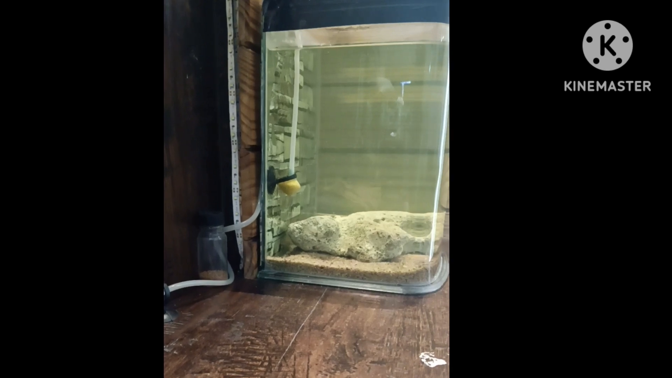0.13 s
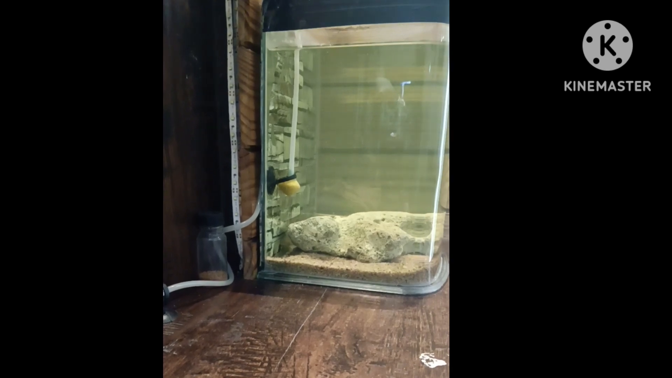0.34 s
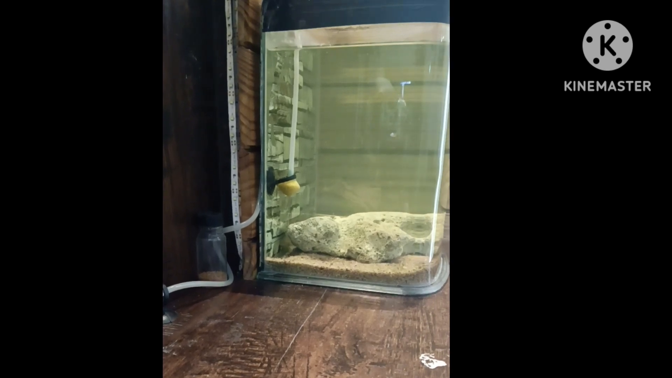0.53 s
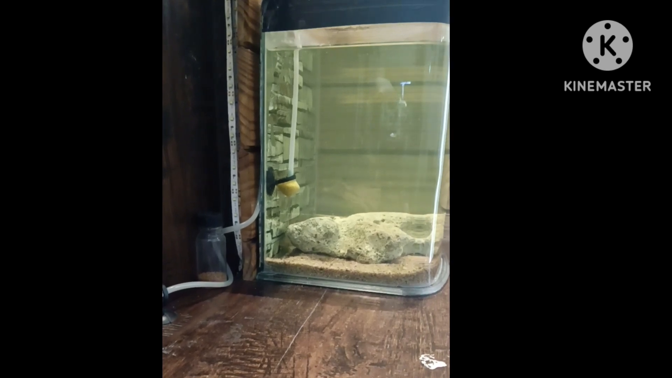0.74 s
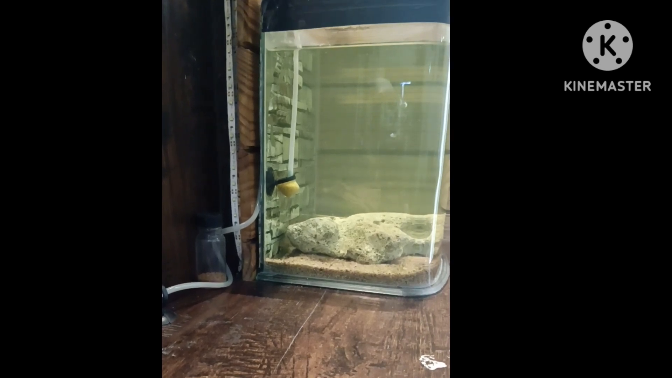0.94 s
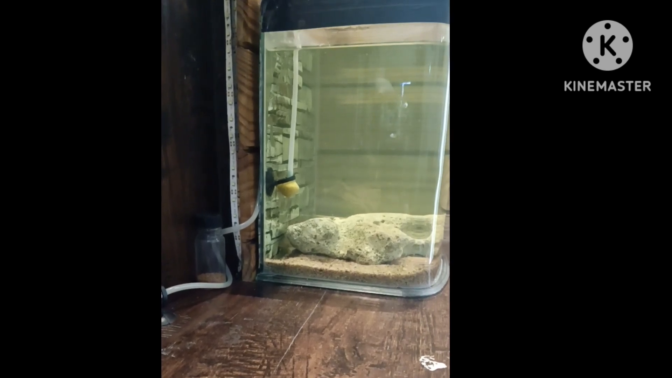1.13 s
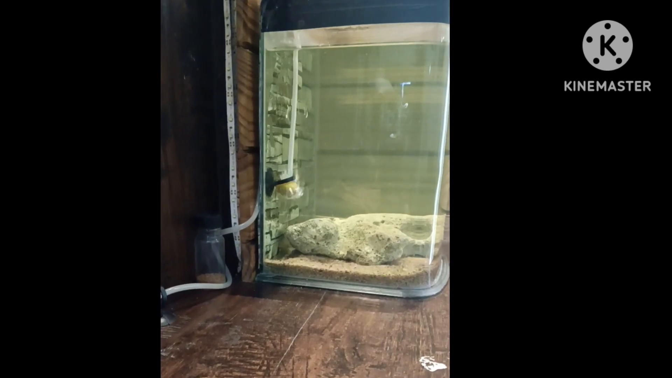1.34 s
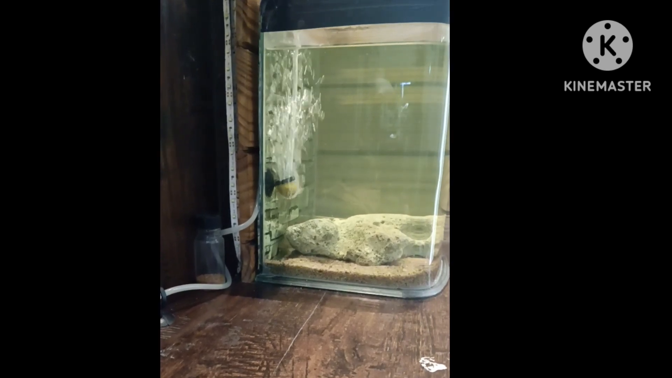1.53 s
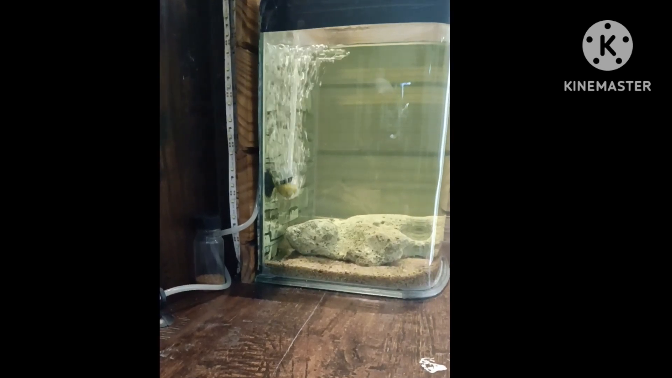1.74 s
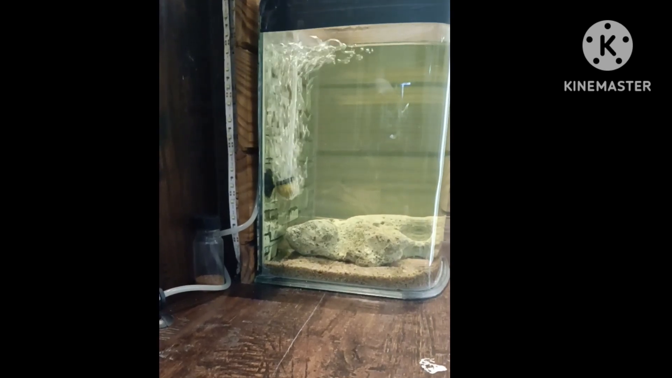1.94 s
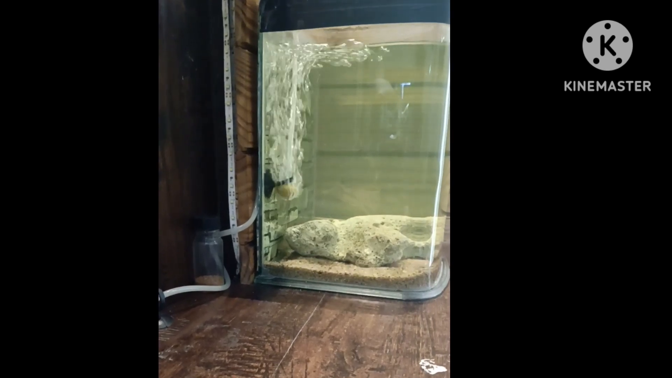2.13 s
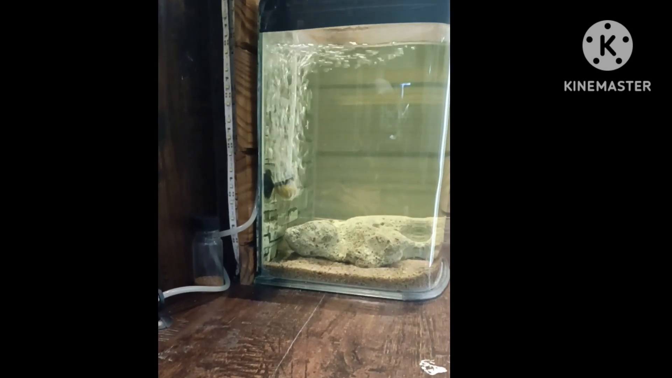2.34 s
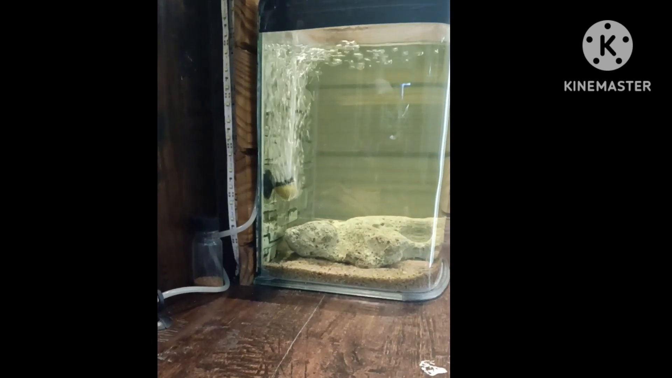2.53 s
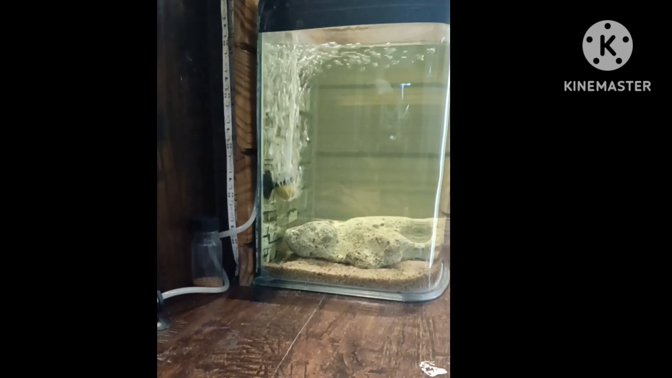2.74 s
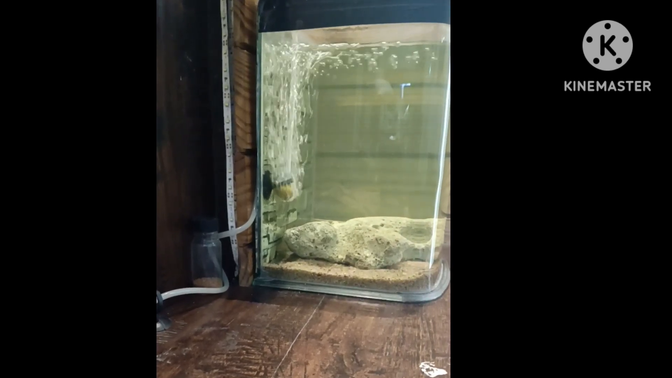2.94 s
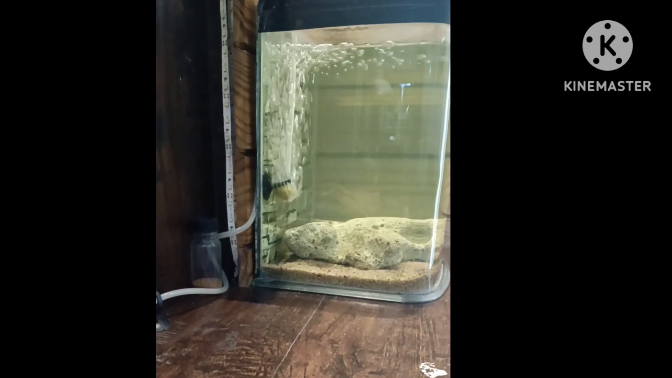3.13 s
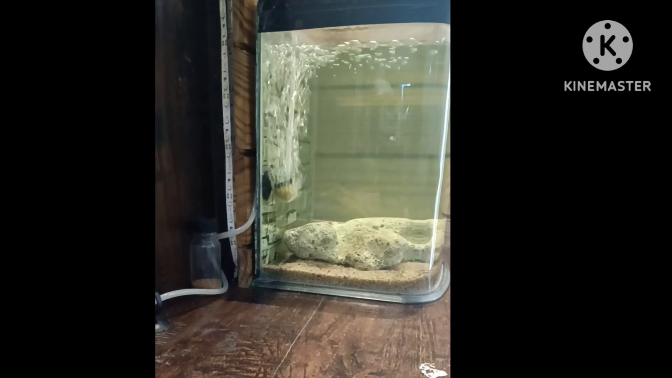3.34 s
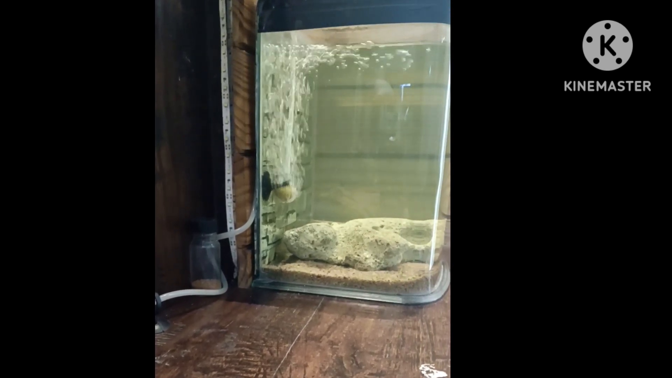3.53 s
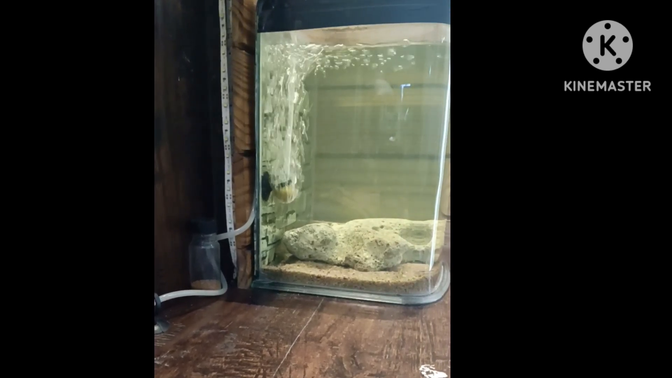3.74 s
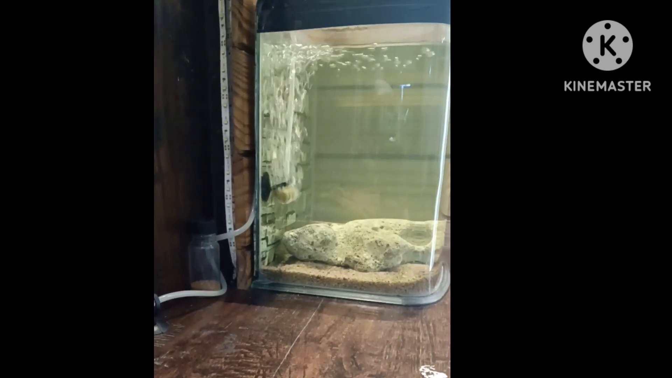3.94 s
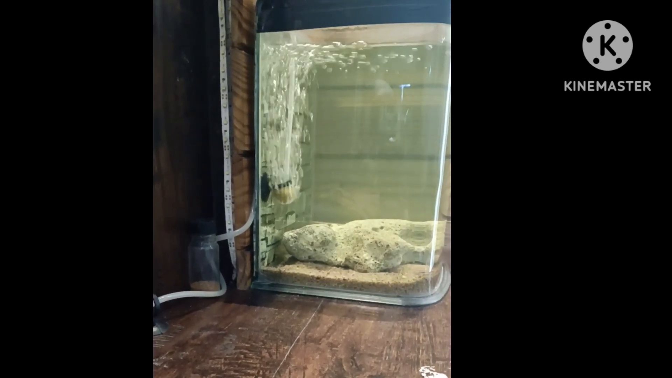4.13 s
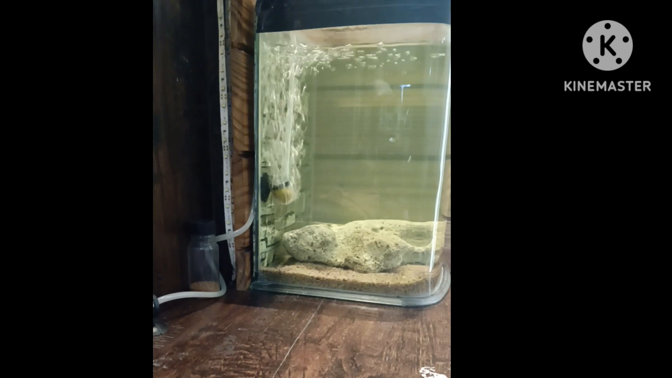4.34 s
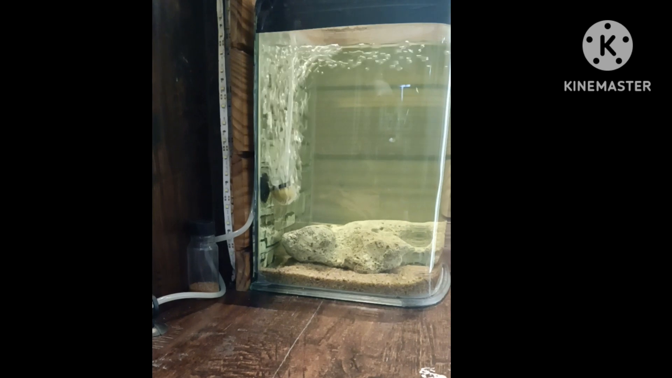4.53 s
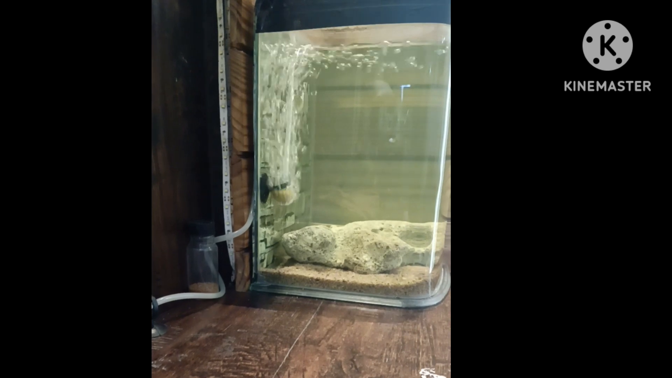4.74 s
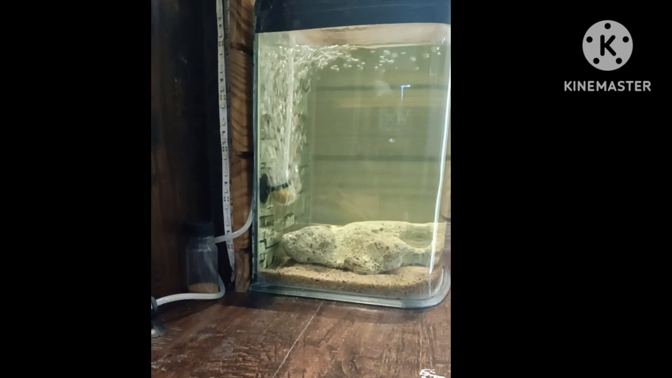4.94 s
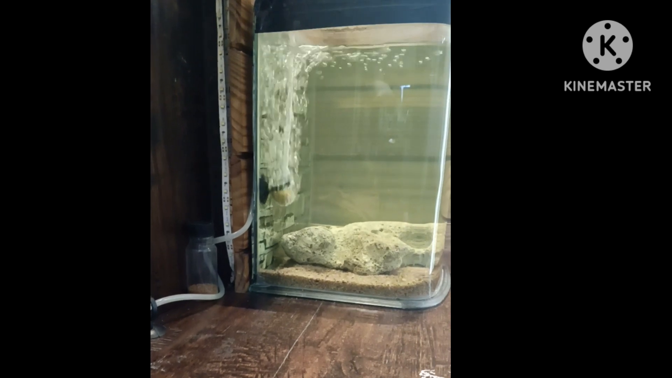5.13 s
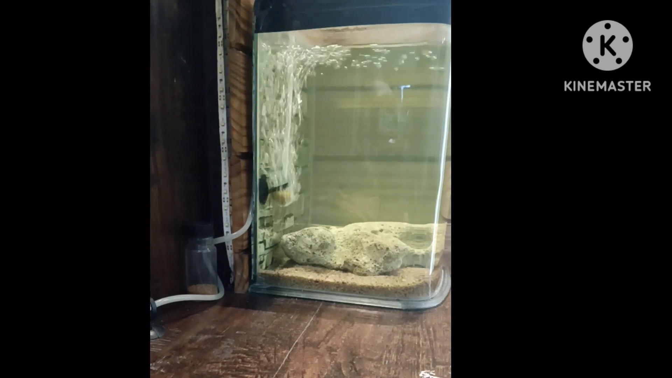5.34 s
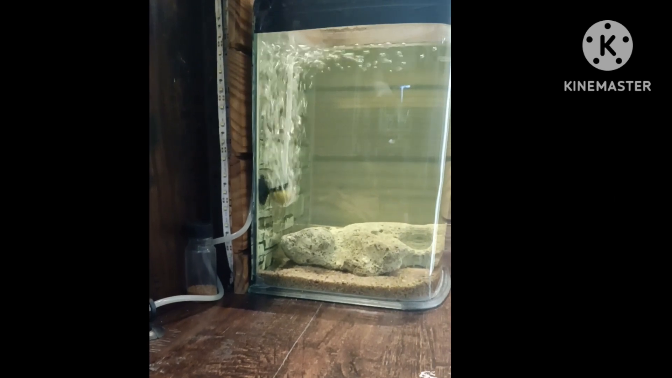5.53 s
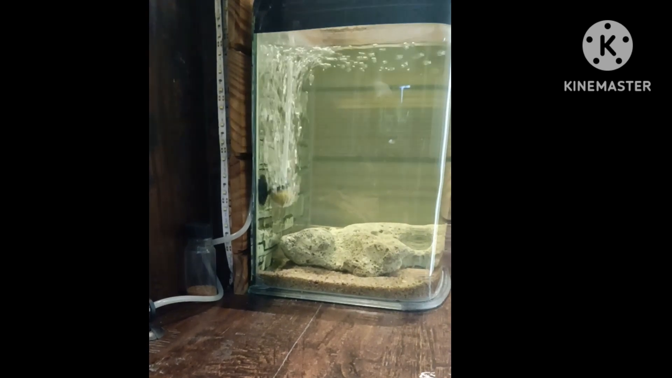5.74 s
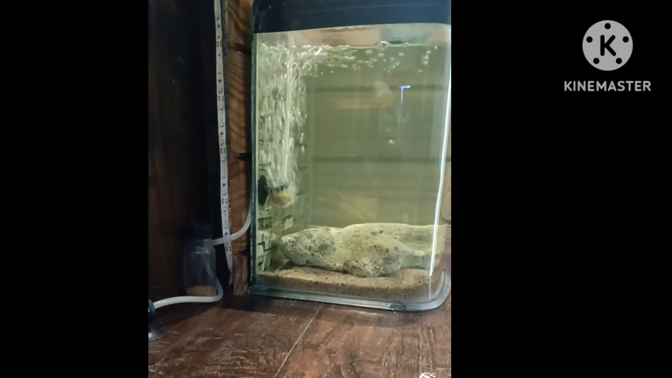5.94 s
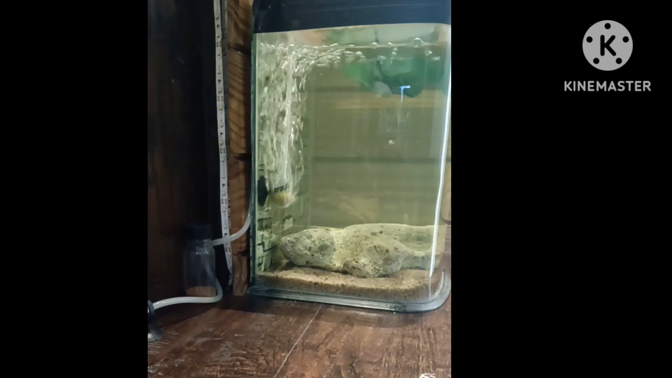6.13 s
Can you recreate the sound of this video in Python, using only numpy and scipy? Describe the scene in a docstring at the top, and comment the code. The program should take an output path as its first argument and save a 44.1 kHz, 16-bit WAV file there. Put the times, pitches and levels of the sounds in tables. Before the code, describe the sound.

A quiet small room, heard closely in stereo by a phone. From 0 to 0.9 s there are soft low bumps, light taps, a brief rustle and finger scratches toward the left, with faint high chirps over low room air. At 0.98 s a plastic switch clicks sharply on the left. Around 1.15 s a diaphragm air pump jolts on with knocks, slapping loosely and harshly until about 1.35 s, then tightening into a steady 100 Hz-based buzz, strongest around 1.0 to 1.4 kHz, with a rattling housing. From 1.23 s air rushes into the water, its low gurgle swelling until 2.3 s, then collapsing as the buzz briefly thins. Afterwards the buzz holds nearly constant to the end at 6.3 s, over fine hiss, soft burbling, scattered plops and deep glugs, notably near 2.9, 3.5 and 5.6 s, gradually calming. Faint chirps continue.

```python
"""A quiet room beside a fish tank: soft bumps, taps and finger scratches on the phone, faint high chirps.
A switch clicks left of the microphones, and a diaphragm air pump jolts into motion.
Its armature knocks twice per mains cycle: loosely at first, then as a steady buzz once the hose holds pressure.
A first rush of air gurgles out of the air stone and collapses; glugs, plops and a fine hiss go on.
Tones and filtered noise make the buzz and rattle, noise the air and hiss, short rings the bubbles and bumps."""
import sys
import numpy as np
from scipy import signal
from scipy.fft import rfft, irfft
from scipy.io import wavfile

SR = 44100
rng = np.random.default_rng(int(sys.argv[2]) if len(sys.argv) > 2 else 0)


def to_wav(s):
    """Save 16-bit WAV."""
    ch = np.atleast_2d(s).T  # columns
    pcm = np.round(np.clip(ch, -1, 1) * 32767)  # PCM
    wavfile.write(sys.argv[1], SR, pcm.astype(np.int16))


N = 277389
TIME = np.arange(N) / SR  # s
FREQ = np.arange(N // 2 + 1) * SR / N  # Hz


def undb(db):
    """Decibels to gain."""
    return 10 ** (np.asarray(db) / 20)


def unit(x):
    """Scale to rms 1."""
    return x / np.sqrt(np.mean(x ** 2))


def pan(db):
    """Left and right gains for a level difference, positive towards the left."""
    return undb(np.array([[db], [-db]]) / 2)


def walk(rate_hz):
    """Smooth random wander of spread 1: noise under a Gaussian low-pass."""
    return unit(irfft(rfft(rng.standard_normal(N)) * np.exp(-(FREQ / rate_hz) ** 2), N))


def spell(start, attack, hold, release):
    """A 0-1 envelope: start time, then the lengths of attack, hold and release, all in s."""
    return np.interp(TIME, start + np.cumsum([0, attack, hold, release]), [0, 1, 1, 0])


def noise(points, alike_hz):
    """Stereo noise with a spectrum in dB per Hz; the channels are most alike below alike_hz."""
    hz, *sides = np.transpose(points)
    gain = undb([np.interp(np.log(FREQ + 1), np.log(hz), db) for db in sides])
    likeness = .9 / (1 + (FREQ / alike_hz) ** 4)
    mid, side = rfft(rng.standard_normal((2, N)))
    common = mid * np.sqrt(1 + likeness)
    opposed = np.array([[1], [-1]]) * side * np.sqrt(1 - likeness)
    return irfft((common + opposed) * gain, N) * np.sqrt(SR / 4)


def bursts(rows, spread, alike, left_db, count=8, glide=0):
    """Short swelling rings, each a cluster of close partials whose pitch glides by a share per length."""
    out = np.zeros((2, N))
    for s, db, hz, length in rows:
        start = int(s * SR)
        t = TIME[:min(N - start, int(5 * length * SR) + 2)]
        partials = hz * (1 + spread * rng.standard_normal((count, 1)))
        phases = rng.uniform(0, 2 * np.pi, (count, 1))
        phases = phases + (1 - alike) * np.pi * rng.standard_normal((2, count, 1))
        age = 2 * t / length
        shape = age * np.exp(1 - age)  # peaks at half the length
        glided = np.cumsum(1 + glide * (age - 1) / 2) / SR
        ring = np.sin(2 * np.pi * partials * glided + phases).sum(1) * shape
        out[:, start:start + len(t)] += undb(db) * unit(ring) * np.sqrt(np.mean(shape ** 2) / 2)
    return out * pan(left_db)


def swarm(level_db, low_hz, high_hz, length_s, spread_db, count):
    """Burst rows at a loosely even rate, with sizes scattered around a level or level curve."""
    late, pitch, size, last = rng.random((count, 4)).T
    when = (np.arange(count) + late) / count  # share of the whole span
    db = np.broadcast_to(level_db, N)[(when * (N - 1)).astype(int)] + spread_db * (2 * size - 1)
    hz = low_hz * (high_hz / low_hz) ** pitch
    return np.transpose([when * (N - SR // 50) / SR, db, hz, length_s * (.5 + last)])


# the pump starts, and reaches full swing this much later (s)
ON_S, SPIN_UP_S = 1.163, 0.013
# the first rush of air: arrives and peaks (s); takes this long to open and to collapse (s)
RUSH_S, RUSH_PEAK_S, RUSH_OPEN_S, RUSH_FALL_S = 1.23, 2.293, 0.021, 0.17


def air_flow():
    """The rush swells, collapses and eases to a steady stream: rush 0-1, gurgle and hiss guide levels in dB."""
    rush = spell(RUSH_S, RUSH_OPEN_S, RUSH_PEAK_S - RUSH_S - RUSH_OPEN_S, RUSH_FALL_S)
    swell = spell(RUSH_S, RUSH_PEAK_S - RUSH_S, 0, RUSH_FALL_S)
    excess = np.exp(-np.maximum(TIME - ON_S, 0) / 2.2)
    gurgle_db = -62 + 11.5 * swell + 5 * excess
    hiss_db = -74.5 + 7.5 * rush
    return rush, gurgle_db, hiss_db


# spectrum of the still room: f/Hz, relative level/dB per Hz
ROOM_SPECTRUM = [(25, -43), (60, -47), (125, -25), (200, -1.5), (350, -9), (395, 3), (450, -7), (650, -2.5),
                 (1280, -10), (3300, -16.5), (4300, -13.5), (8500, -29.5), (10900, -25), (15000, -42)]


def room_air():
    """Still air of the room, slightly stronger on the left: shaped noise that sways gently in level."""
    sway_db = .6 * walk(6)
    return unit(noise(ROOM_SPECTRUM, 990)) * undb(-62.5 + sway_db) * pan(2.9)


def rumble(rush):
    """Low noise that comes with the handling, lingers, and returns with the rush of air."""
    handling = spell(0, 0, 0.53, 0.11)
    lingering = (1 - handling) * spell(0, 0, RUSH_S, RUSH_OPEN_S)
    shake = undb(-64) * handling + undb(-66.5) * lingering + undb(-64.5) * rush
    # f/Hz, relative level/dB per Hz
    spectrum = [(20, -22), (55, -19.5), (115, 6.0), (170, -4.5), (280, -1.5), (500, -11.5), (1200, -58)]
    return unit(noise(spectrum, 900)) * shake * undb(-1.5 + 3.9 * walk(7.8))


def rustle():
    """A light rustle goes with the first handling: fluttering broadband noise, leaning left."""
    # f/Hz, relative level/dB per Hz
    spectrum = [(500, -12), (1000, -4), (3000, 1), (4300, 3), (5900, 1), (7500, -8), (13500, -15), (15000, -35)]
    level = undb(-71.5) * spell(0, 0.097, 0.22, 0.7)
    return unit(noise(spectrum, 900)) * level * undb(2.8 * walk(14)) * pan(5)


def flecks():
    """Tiny high rings scattered through the whole span, near the pitch of the chirps."""
    return bursts(swarm(-74, 3800, 5100, 0.022, 8.5, count=190), 0.02, 0.48, 2)


# soft bumps of handling: t/s, level/dB, length/s
BUMP_ROWS = [(.005, -49.5, 0.029), (.135, -55.5, 0.02), (.405, -53, 0.054), (.46, -52.5, 0.024),
             (1.005, -51, 0.047)]


def bumps():
    """Soft bumps of handling, all booming at one pitch, nearly alike in both microphones."""
    boom_hz = 126.5
    return bursts([(s, db, boom_hz, length) for s, db, length in BUMP_ROWS], 0.033, 0.98, 1.1)


# scratches of fingers on the phone: t/s, level/dB, f/Hz, length/s
SCRATCH_ROWS = [(.095, -66, 5900, .016), (.12, -66, 3950, .02), (.2, -68, 3050, 0.033),
                (.21, -65, 5700, .02), (.272, -53.5, 1740, 0.011), (.285, -67, 2450, .022),
                (.3, -62, 4400, 0.027), (.36, -69, 5750, 0.016), (.41, -68, 4450, 0.017)]


def scratches():
    """Fingers scratch the phone, well to the left: many partials per burst make a rough, noisy ring."""
    return bursts(SCRATCH_ROWS, 0.056, 0.53, 11, count=40)


# the clearest of the faint high chirps: t/s, level/dB before a common 2.5 dB lift, f/Hz
CHIRP_ROWS = [(0.13, -67, 4200), (.217, -64, 2840), (0.307, -61.5, 4020), (0.667, -63, 2940),
              (0.874, -64, 4380), (2.371, -68, 4140), (2.505, -73, 3770), (2.65, -73, 4750),
              (2.95, -74, 4550), (3.08, -68, 3800), (3.244, -63, 4200), (3.55, -69, 4290),
              (3.63, -69, 4850), (3.659, -70, 4130), (3.74, -68, 4360), (3.83, -70, 4150),
              (4.02, -73, 4130), (4.21, -79, 4090), (4.28, -66, 4080), (4.48, -67, 4700), (5.06, -73, 4230),
              (5.135, -67, 4050), (5.285, -73, 4730), (5.4, -66, 4200), (5.525, -65.5, 4760),
              (5.7, -70, 4400), (5.795, -64, 4300), (5.84, -64, 4820), (6.18, -66.5, 4450)]


def chirps():
    """Faint high chirps to the left: narrow clusters that glide slightly down."""
    length_s = 0.032
    rows = [(*chirp, length_s) for chirp in CHIRP_ROWS]
    return undb(2.5) * bursts(rows, .022, 0.5, 6, glide=-.012)


# thin sizzles: t/s, level/dB, f/Hz, length/s
SIZZLE_ROWS = [(.197, -61, 7160, 0.015), (.2, -62.5, 10800, .018), (.976, -57, 11000, 0.0043),
               (1.158, -68, 12500, .004), (2.52, -69, 10600, .02), (3.63, -71, 10600, .01),
               (4.41, -73, 9300, .02), (4.465, -64.5, 10400, 0.021), (5.9, -66.5, 10400, 0.03),
               (5.93, -72, 7300, .03)]


def sizzles():
    """Thin sizzles in the top octave: bursts so dense in partials that they sound like noise."""
    return bursts(SIZZLE_ROWS, 0.031, 0.47, 0, count=80)


# light taps of handling: t/s, level/dB, f/Hz
TAP_ROWS = [(.295, -53.5, 292), (.375, -55.5, 740), (.62, -60, 630), (.89, -56.5, 677)]


def taps():
    """Light taps of handling, left of centre: short mid-pitched rings."""
    length_s = 0.018
    return bursts([(*tap, length_s) for tap in TAP_ROWS], 0.075, 0.77, 5.5)


# the switch snaps over and seats: t/s, level/dB
SWITCH_SNAPS = [(.9775, -39), (0.981, -51)]
# ringing modes of its plastic: f/Hz, level/dB against the snap, time to fall by 60 dB/s
PLASTIC_MODES = [(1390, -27, 0.22), (1668, -7, 0.056), (1708, 0.5, 0.053), (1950, -19, .07),
                 (2500, -21, .06)]


def switch():
    """A plastic switch clicks on the left as decaying modes, and the room answers briefly with noise."""
    # f/Hz, relative level/dB per Hz
    spectrum = [(500, -29), (1750, -18), (2800, -20), (6000, -29), (9500, -17), (14000, -18)]
    answer = unit(noise(spectrum, 800))
    out = 0
    for s, db in SWITCH_SNAPS:
        t = np.maximum(TIME - s, 0)
        ring = sum(undb(level - 60 * t / t60) * np.sin(2 * np.pi * hz * t) for hz, level, t60 in PLASTIC_MODES)
        onset = 1 - np.exp(-t / 0.0015)
        tail = answer * undb(-21 - 60 * t / 0.12)
        out = out + undb(db) * onset * (ring * pan(17.0) + tail)
    return out


# jolts of the armature as it starts and seats: t/s, level/dB before a common 0.5 dB lift, f/Hz, length/s
JOLT_ROWS = [(1.149, -51, 730, 0.016), (1.149, -52.5, 1630, 0.02), (1.149, -57, 2410, 0.018),
             (1.171, -58, 205, 0.034), (1.172, -43, 1060, 0.004), (1.172, -50, 1830, .005),
             (1.18, -47.5, 601, 0.037), (1.19, -49, 1790, 0.027), (1.217, -43, 487, 0.015),
             (1.222, -49, 910, .016), (1.322, -46, 1060, 0.024)]


def jolts():
    """The armature jolts as it starts and seats, left of centre: dense short rings."""
    return undb(0.5) * bursts(JOLT_ROWS, 0.08, 0.85, 6.4, count=30)


STROKE_HZ = 99.9


def line_phase(k, contacts):
    """Phase of line k when every contact of the stroke rings the housing at its own moment."""
    f = k * STROKE_HZ
    response = 0
    for share, hz, width, db in contacts:
        delay = np.exp(-2j * np.pi * k * share)
        response = response + undb(db) * delay / (1 + 2j * (f - hz) / width)
    return np.angle(response)


# contacts within one loaded stroke, hardest first: share of the cycle, ring f/Hz, width/Hz, relative level/dB
LOADED_CONTACTS = [(.89, 1250, 380, 0), (.28, 800, 400, -2), (.53, 1250, 440, -4), (.98, 1200, 750, -5)]
# lines of the loaded pump before its moving gains: multiple of the stroke rate,
# left level/dB, right level/dB, change while the armature is unseated/dB
LOADED_LINES = [(1, -84, -88, 0), (2, -69, -63, -3), (3, -61, -65, 1), (4, -67, -72, 0), (5, -66, -67, -3),
                (6, -63, -60.5, -2), (7, -67, -59.5, -3), (8, -52, -62.5, -13), (9, -61.5, -63.5, -5),
                (10, -50.4, -56.3, -4), (11, -47.3, -49.2, .5), (12, -58.5, -57.5, -7),
                (13, -46.2, -45.2, -.7), (14, -52, -46.4, -3.5), (15, -78, -79, 10), (16, -82, -62, -5),
                (17, -60.5, -61.5, -10), (18, -56, -58, -4), (19, -61.5, -60.3, -3), (20, -104, -89, 0),
                (21, -82, -79, 8), (22, -87, -98, 8), (23, -94, -84, 0), (45, -86, -85, 0),
                (46, -83, -84, 0), (47, -86, -85, 0), (48, -85, -86, 0), (50, -86, -84, 0),
                (51, -86, -79, 0), (52, -88, -81, 4), (53, -83, -76, 4)]
# single lines of the hum fade for a moment: multiple, middle t/s, half length/s, level/dB
LINE_FADES = [(10, 5.2, .4, -3.5), (11, 5.5, .13, -3.5), (13, 5.72, .22, -2.5), (14, 5.83, .18, -3.5)]


def loaded_hum(cycle, unseated, drive, low, tone, whistle):
    """Loaded strokes sum as harmonics of the stroke rate, locked to one cycle and wavering in level."""
    out = np.zeros((2, N))
    for k, left, right, thinning_db in LOADED_LINES:
        gain = low if k <= 3 else tone if k == 8 else whistle if k > 40 else drive
        waver_db = (.4 if 10 <= k <= 14 else 3.2 if k > 40 else 1.7) * walk(12)
        fade_db = sum(db * np.exp(-((TIME - s) / half) ** 2) for line, s, half, db in LINE_FADES if line == k)
        wander = undb(waver_db + fade_db + thinning_db * unseated)
        # reflections shift the phase at each microphone, most outside the strong middle lines
        shift = (.08 if 8 <= k <= 14 else .35) * rng.standard_normal((2, 1))
        # the low lines travel through the table and lose step with the knocks
        table_shift = (k < 8) * 1.3 * rng.standard_normal()
        phase = line_phase(k, LOADED_CONTACTS) + shift + table_shift
        out += undb([[left], [right]]) * gain * wander * np.cos(2 * np.pi * k * cycle + phase)
    return out


# the two contacts of a loose stroke: share of the cycle, ring f/Hz, width/Hz, relative level/dB
LOOSE_CONTACTS = [(.72, 1250, 220, 0), (.54, 1230, 800, -5)]
# lines while the armature swings without back pressure: multiple of the stroke rate, relative level/dB
LOOSE_LINES = [(1, -26), (2, -17), (3, -17), (4, -20), (5, -18), (6, -15), (7, -22), (8, -8), (9, -6),
               (10, -9), (11, -2), (12, 0), (13, 0), (14, -9), (15, -15), (16, -22), (17, -23), (18, -14),
               (19, -25), (20, -19), (21, -24), (22, -33), (51, -33), (52, -28), (53, -29)]


def loose_slap(cycle):
    """Without back pressure the armature slaps harder: harmonics phased by two contacts per stroke."""
    out = np.zeros((2, N))
    for k, db in LOOSE_LINES:
        shift = (.15 if 11 <= k <= 13 else 1.5) * rng.standard_normal((2, 1))
        phase = line_phase(k, LOOSE_CONTACTS) + shift
        out += undb(db - 42.5) * np.cos(2 * np.pi * k * cycle + phase)
    return out


# spectrum of the housing rattle before its moving gain: f/Hz, left level/dB per Hz, right level/dB per Hz
RATTLE_SPECTRUM = [(243, -104, -104), (428, -107.5, -115), (640, -94, -93), (803, -78, -88),
                   (880, -80.5, -79), (970, -74, -79), (1384, -78.5, -81), (1730, -86.5, -100.5),
                   (1820, -77.5, -82), (1855, -79.5, -81), (2160, -110, -107), (3160, -122, -122)]


def housing_rattle(cycle, unrest_db):
    """Uneven contacts rattle the housing: noise gated once per stroke."""
    # strongest just after the hardest contact
    gate = .8 + .8 * np.cos(np.pi * (cycle - .91)) ** 12
    return noise(RATTLE_SPECTRUM, 1000) * gate * undb(-4.0 + unrest_db + 0.74 * walk(8.9))


# course of the running buzz, where -46 dB is unity gain: t/s, level/dB
BUZZ_COURSE = [(1.18, -48), (1.225, -44.5), (1.4, -44), (1.64, -44), (2.5, -44), (3.6, -44), (5.3, -45),
               (5.9, -45), (6.1, -44.5), (6.29, -44.5)]
# the armature swings loose until the hose holds pressure: start t/s, attack/s, hold/s, release/s
SWINGS_LOOSE = (1.206, .016, .088, .042)
# the armature is not fully seated and the buzz thins: start t/s, attack/s, hold/s, release/s
NOT_SEATED = [(1.206, .016, .15, .25), (2.325, .05, .075, .04)]


def pump(running, gurgle_db, hiss_db):
    """Mains-locked strokes; slack advances the stroke and makes it slap harder; the housing rattles."""
    drive_db = np.interp(TIME, *np.transpose(BUZZ_COURSE)) + 46.0
    drive = undb(drive_db)
    start, attack, hold, _ = SWINGS_LOOSE
    slack = .92 * spell(*SWINGS_LOOSE)
    unseated = sum(spell(*shape) for shape in NOT_SEATED)
    # the contacts chatter at the start, then seat
    chatter = spell(ON_S, 0, 0.02, 0.019)

    # stroke timing in cycles: the lead gained while loose is lost again in .035 s
    lead = .05 * spell(start, attack + hold, 0, .035)
    jitter = (.0005 + .003 * unseated) * walk(25) + .014 * chatter * walk(70)
    cycle = STROKE_HZ * TIME + .35 + lead + jitter

    # the lowest lines and the thin whistle follow the air flow
    low = undb(0.93 * (gurgle_db + 63))
    whistle = undb(hiss_db + 71)
    # the 800 Hz tone gains as the buzz sags
    tone = undb(4.0 - 0.57 * drive_db + 1.0 * walk(40))
    # a 2 kHz line sings while the armature is unseated
    sing = undb(-62 + 3.1 * walk(22)) * unseated * np.cos(2 * np.pi * 20 * cycle + .8 * walk(30))

    loaded = loaded_hum(cycle, unseated, drive, low, tone, whistle) * (1 - slack)
    loose = drive * loose_slap(cycle) * slack
    unrest_db = 4.5 * chatter + 3.5 * slack + 1.5 * unseated
    return running * (loose + loaded + sing + housing_rattle(cycle, unrest_db))


# spectrum of the churning plume: f/Hz, relative level/dB per Hz
PLUME_SPECTRUM = [(30, -47), (55, -45), (85, -30.5), (125, -9.5), (200, -20.5), (310, -2.5), (420, -11),
                  (700, -26), (1500, -76)]


def plume(rush, gurgle_db):
    """The plume churns as lumpy low noise, and swarms of bubbles ring in it near the water's resonance."""
    lumps_db = 3.8 * walk(18)
    churn = unit(noise(PLUME_SPECTRUM, 320)) * undb(gurgle_db - 9.5 + lumps_db)
    gurgle = bursts(swarm(gurgle_db - 9.0, 174, 377, 0.0072, 1.5, count=150), 0.14, 0.7, 0)
    # the first rush of air drives the water at its resonance; afterwards mostly single bubbles do
    surge_db = gurgle_db - 7 - 30 * (1 - rush)
    surge = bursts(swarm(surge_db, 175, 365, 0.016, 6, count=260), 0.04, 0.8, 2.5, glide=.04)
    small_glugs = bursts(swarm(gurgle_db - 1.5, 280, 335, 0.02, 5, count=55), 0.03, .79, 2.9)
    return churn + gurgle + surge + small_glugs


def surface_burble():
    """Lesser bubbles burst all the time in loose clusters, more gently as the stream settles."""
    clustering_db = 1.5 * walk(7)
    # the air flow falters as the first rush ends
    falter_db = -9 * spell(2.3, .04, .09, .02)
    level_db = -57.0 - 1.64 * (TIME - ON_S) + clustering_db + falter_db
    return bursts(swarm(level_db, 560, 770, 0.014, 6, count=440), 0.035, 0.84, 2.5, glide=.02)


# spectrum of the air stone: f/Hz, relative level/dB per Hz
STONE_SPECTRUM = [(2500, -44), (3600, -6), (4600, 1.5), (5300, 2.5), (5600, -2.5), (7500, -12),
                  (11000, -53), (14000, -63)]


def air_stone(hiss_db):
    """The air stone hisses as sputtering noise; the finest bubbles ring briefly as they leave it."""
    sputter_db = 2.4 * walk(22)
    hiss = unit(noise(STONE_SPECTRUM, 1500)) * undb(hiss_db - 4.0 + sputter_db)
    fizz = bursts(swarm(hiss_db - 3, 4200, 5500, 0.011, 7, count=260), 0.015, 0.4, 0)
    return hiss + fizz


# the biggest bubbles, ringing near the plume's resonance: t/s, level/dB before the ring's 2.5 dB cut, f/Hz
GLUG_ROWS = [(1.465, -46, 293), (1.556, -51, 303), (1.579, -50, 228), (1.629, -54, 330), (1.746, -52, 202),
             (1.799, -52, 311), (1.849, -58, 328), (1.924, -52, 200), (2.048, -47, 301),
             (2.104, -41.5, 200), (2.11, -49, 338), (2.17, -44.5, 322), (2.225, -47, 308),
             (2.236, -49, 202), (2.285, -47, 339), (2.631, -50.5, 209), (2.739, -53, 299),
             (2.869, -50, 243), (2.918, -45, 297), (2.989, -51, 244), (3.532, -45, 304),
             (3.605, -45.5, 292), (4.068, -55, 310), (4.12, -56, 287), (4.75, -56, 300), (4.967, -51, 298),
             (5.612, -43.5, 300)]


def big_glugs():
    """Big bubbles glug with a rising ring, left of centre, and each also thumps the tank."""
    rings = bursts([(*glug, 0.024) for glug in GLUG_ROWS], 0.029, 0.89, 4.7, glide=0.044)
    thumps = bursts([(s, db - 16, 120, 0.014) for s, db, _ in GLUG_ROWS], 0.1, 0.98, 0)
    return undb(-2.5) * rings + thumps


# the loudest bubbles bursting at the surface: t/s, level/dB, f/Hz
PLOP_ROWS = [(1.53, -57, 630), (1.62, -53, 667), (1.752, -47, 678), (1.855, -57, 643), (1.955, -55, 653),
             (2.055, -49.5, 670), (2.47, -52, 613), (2.903, -48.5, 660), (3.0, -50, 607), (3.12, -54, 663),
             (3.23, -53, 672), (3.4, -48, 659), (3.8, -53, 587), (4.049, -50, 670), (4.238, -48.5, 670),
             (4.28, -63, 675), (4.4, -52.5, 678), (5.206, -51, 696), (6.01, -51, 682)]


def surface_plops():
    """Bubbles plop at the surface: short rings nearly alike in both microphones."""
    length_s = 0.03
    return bursts([(*plop, length_s) for plop in PLOP_ROWS], 0.05, 0.98, 0.8)


def scene():
    """Room and handling, switch, pump and bubbles together."""
    running = np.clip((TIME - ON_S) / SPIN_UP_S, 0, 1) ** 2
    rush, gurgle_db, hiss_db = air_flow()
    room = room_air() + rumble(rush) + flecks() + chirps() + sizzles()
    handling = rustle() + bumps() + scratches() + taps()
    machine = switch() + jolts() + pump(running, gurgle_db, hiss_db)
    stream = running * (plume(rush, gurgle_db) + surface_burble() + air_stone(hiss_db))
    return room + handling + machine + stream + big_glugs() + surface_plops()


def record(dry):
    """The phone cuts the top: a steep low-pass at 14.6 kHz."""
    return signal.sosfilt(signal.ellip(8, .2, 70, 14600, fs=SR, output="sos"), dry)


dry = scene()
out = record(dry)
to_wav(out)
```